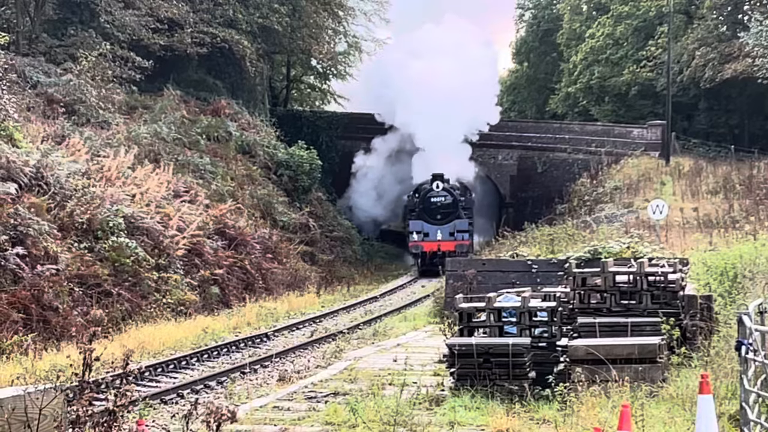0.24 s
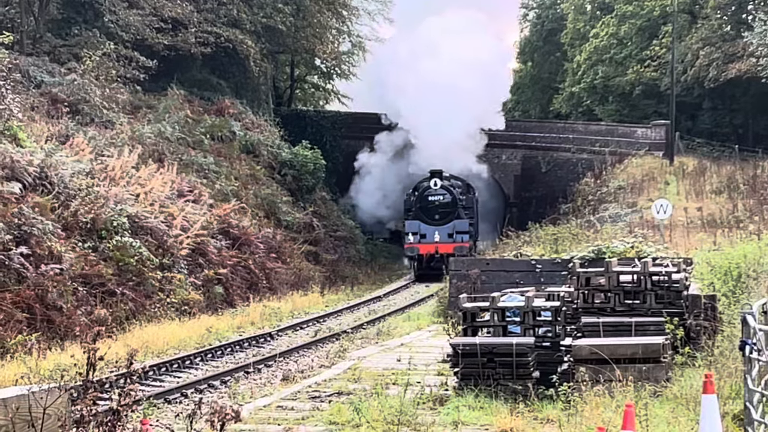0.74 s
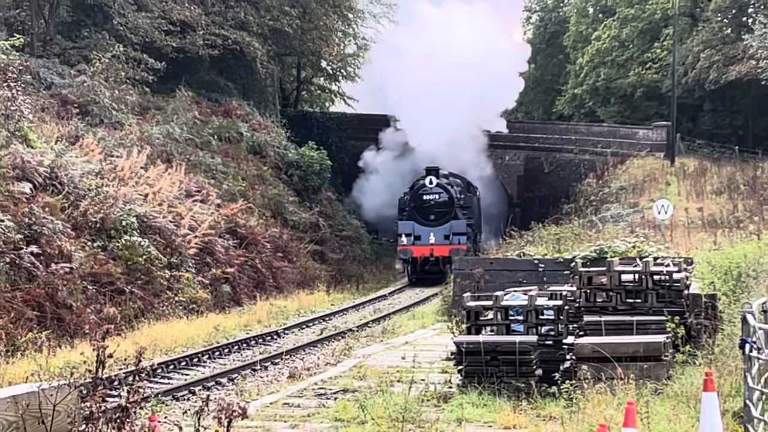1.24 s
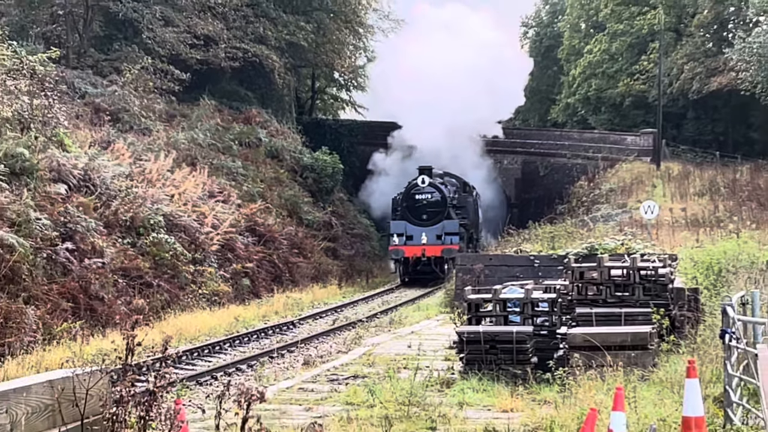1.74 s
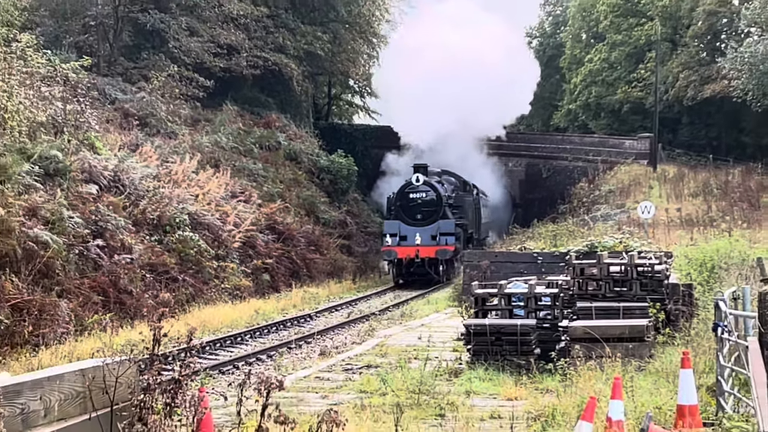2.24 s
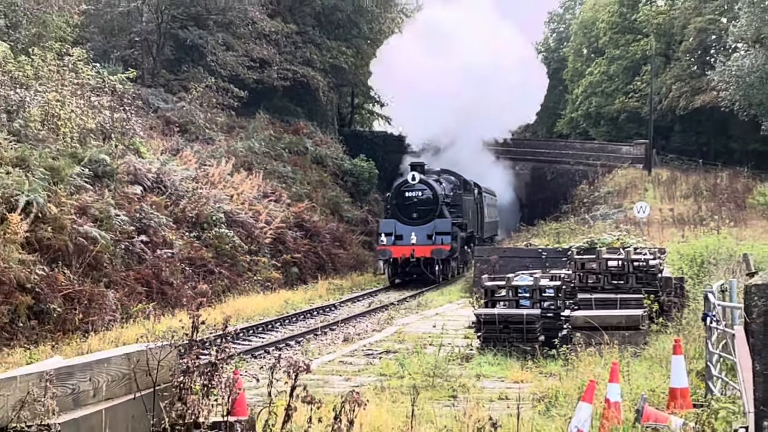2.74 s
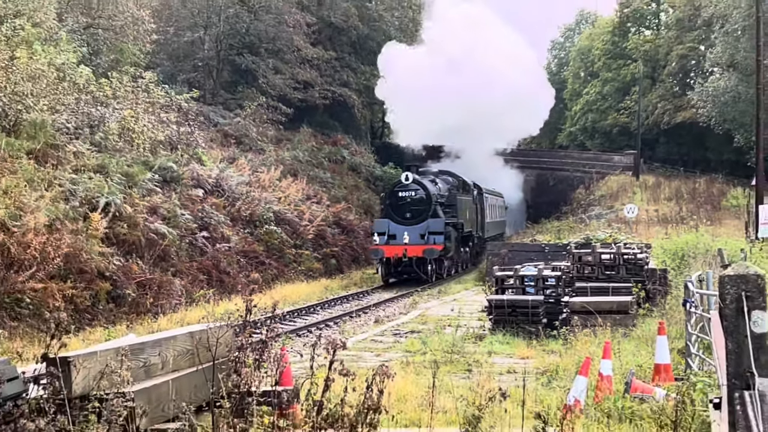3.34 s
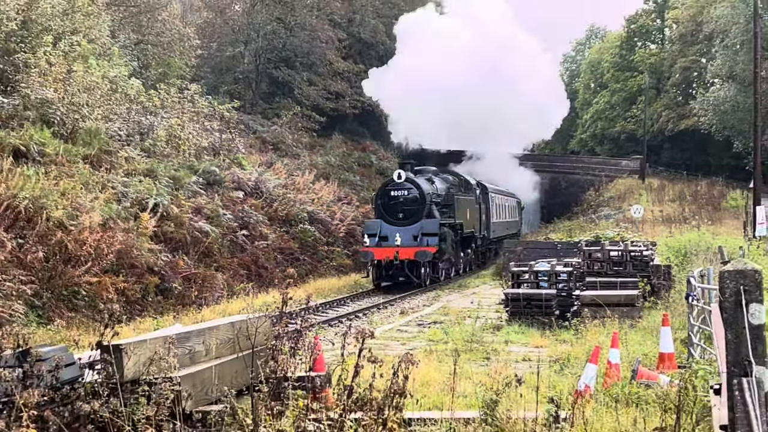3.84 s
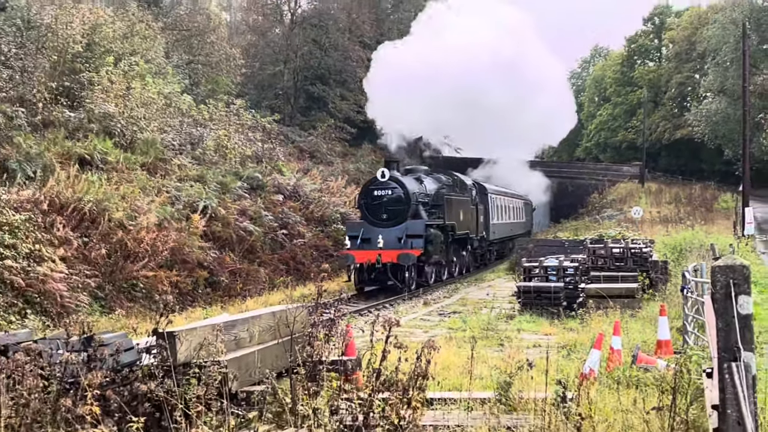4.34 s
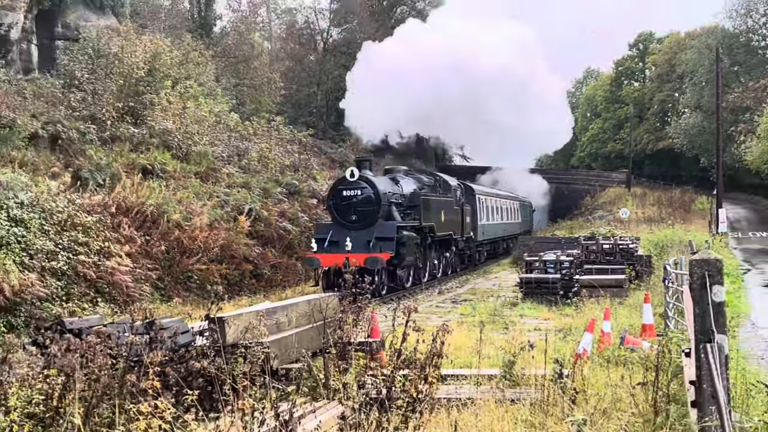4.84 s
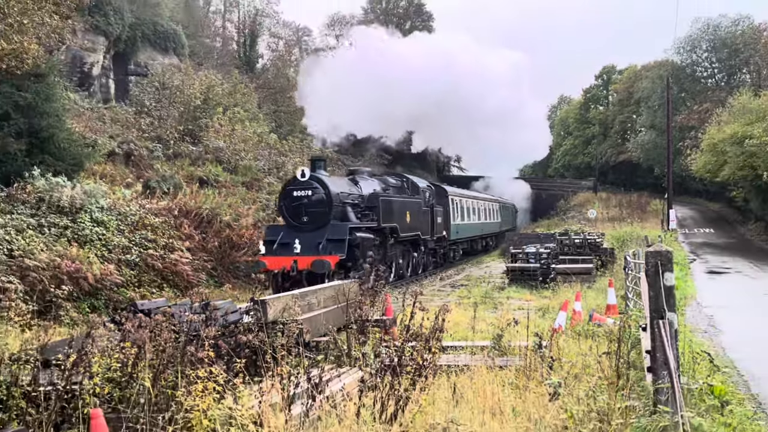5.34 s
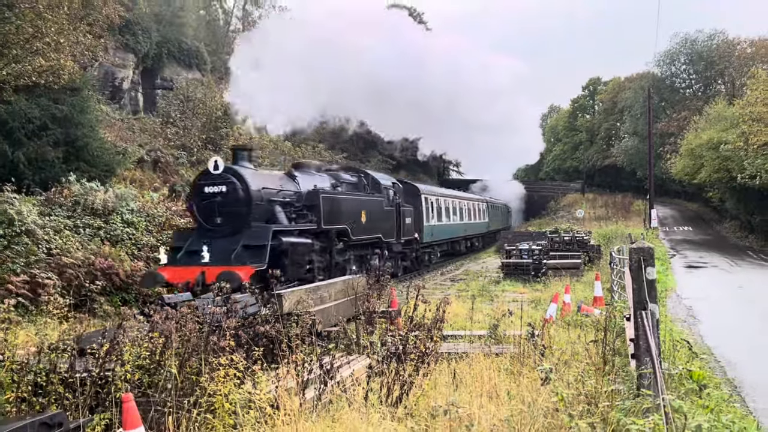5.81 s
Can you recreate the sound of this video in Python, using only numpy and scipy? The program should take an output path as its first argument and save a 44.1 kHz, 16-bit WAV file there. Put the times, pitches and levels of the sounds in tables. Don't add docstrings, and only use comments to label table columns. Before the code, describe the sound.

Outdoors in a wooded railway cutting, the end of a high steam whistle drops away at once and lingers as a thin, wavering echo for about a second. Under it, a steam engine puffs briskly, around nine uneven beats a second. It approaches throughout, the chuffs growing fuller, boomier and much louder, with hiss and wheel rumble filling the gaps. Stereo microphone near the track.

```python
import sys
import numpy as np
from scipy import signal
from scipy.fft import rfft, irfft, next_fast_len
from scipy.io import wavfile
from scipy.ndimage import uniform_filter1d, map_coordinates

SR = 44100
rng = np.random.default_rng(int(sys.argv[2]) if len(sys.argv) > 2 else 0)


def output_pcm(signal):
    pcm = np.clip(np.atleast_2d(signal).T, -1, 1) * 32767
    wavfile.write(sys.argv[1], SR, np.round(pcm).astype(np.int16))


def attenuation_scalar(level_db):
    decades = np.asarray(level_db, float) / 20
    return 10 ** decades


N = 267687

ZONE_HZ = [70, 200, 480, 1800, 7000]
# (pitch [Hz], puff [dB], background [dB])
COLOUR = [(25, -28, -16), (38.6, -13.5, -9.5), (74.5, -3, -4), (123, -11.5, -6.5), (202, -6, -6),
          (292, -8, -9), (485, -0.5, -9), (667, -7, -8.5), (1512, -5.5, -6), (2530, -3.5, -1.5),
          (4280, -9, -1.5), (6470, -1.5, 3.5), (10360, -6.5, -6), (13500, -8, -12)]
# (pitch [Hz], lag [s], rise [s], fall [s], echo tail [dB], gustiness [dB])
PUFF_SHAPE = [
    (50, 0.0083, 0.016, 0.03, -16, -5.5),
    (270, -0.00075, 0.02, 0.026, -9.5, 0.5),
    (1490, -0.0028, 0.014, 0.019, -5.5, 2.5),
    (8800, -0.0038, 0.026, 0.034, 1.5, 3.5),
]
# (pitch [Hz], width [Hz], level [dB])
CHIMNEY = [(66.5, 14, -5.5), (228.3, 20.3, -1.5), (424, 78, -12), (1400, 210, -9)]
# (time [s], level [dB])
WHISTLE_ECHO = [(0, -13.5), (.04, -25.5), (.13, -27.5), (.2, -21), (0.248, -22.5), (.29, -36.5), (.7, -43),
                (1.15, -45), (1.3, -54)]
# (pitch [Hz], width [Hz], level in the multiples [dB], extra fall [dB/s])
WHISTLE_NOTES = [
    (873, 16.4, 1.5, -5),
    (840.7, 47, 2, 7),
    (791, 38, -15, -2),
]
# (starting level [dB], share of the echo fade, extra fall [dB/s])
WHISTLE_PARTS = [
    (-6.5, 1.053, -0.7),
    (-19.5, 0.37, 14),
    (-27, .15, 18.5),
    (-26, 0.13, 30),
]
# (multiple, level over the third [dB], extra fall [dB/s])
TOP_TONES = [(4, 0, 13), (5, -6, 16), (6, -5.5, 10), (7, -7, 26), (8, -9.5, 30), (9, -14, 28),
             (10, -31, 35)]
# (pitch [Hz], left leads by [rad])
PORT_PHASE = [(4900, 0), (7850, -2.5), (8100, -3.08), (8780, -3.2), (9000, -3.8), (11200, -6.1),
              (12900, -6.5), (14700, -9.42)]
# (pitch [Hz], left leads by [rad])
LOW_PHASE = [(0, 0), (170, -.2), (520, -.3), (860, .45), (1550, -.15), (2800, .25), (3600, .05), (4900, 0)]
# (pitch [Hz], left over right [dB])
PORT_BALANCE = [(60, 0), (110, .1), (200, .9), (370, .4), (670, -2.6), (1240, -2.0), (2260, -1.2),
                (4140, 0), (13900, 0)]
# (pitch [Hz], level [dB])
SCATTER = [(40, -30), (90, -26), (200, -20), (370, -21), (670, -12), (1300, -7), (2300, -11), (3100, -16),
           (4300, -26), (6000, -11), (8400, -22), (10000, -15), (12000, -24), (15000, -24)]
# (time [s], first cancelled pitch [Hz], echo level [dB])
GROUND = [(0, 1900, -21), (1.8, 1820, -28), (3.5, 1065, -35), (5.2, 710, -17), (6.07, 637, -14)]
# (pitch [Hz], width [Hz], strongest [s], reach [s], level [dB])
RINGS = [(154, 31, 3.1, 1, 2.5), (1876, 36, 2.7, 0.9, 3), (1550, 53, 3.53, 0.43, 1),
         (1850, 38, 5.6, 1, 5.5)]
# (first puff [s], strength of puffs 1 to 4 [dB] x 4)
TURNS = [(0.048, 1.5, 1.5, -5, -0.5), (0.493, 0, 1.5, -1.5, -4), (0.941, 0.5, 2.5, -1.2, -1.8),
         (1.387, -2, 1.3, 0, -2.5), (1.829, -2.5, 3.5, -1, -1.5), (2.272, -2.5, 3, -0.5, 0.4),
         (2.716, -0.5, 3, 0.8, -1.5), (3.161, 0.5, 2.5, -1.5, -0.3), (3.6, 1, 3, -0.7, -2),
         (4.041, 0, 3, 1.6, -1.5), (4.479, -1.5, 2, -1.2, -2), (4.921, -1, 2.2, 2.1, 2),
         (5.358, 0.3, 3.5, 1.2, -1.5), (5.798, -3.5, 1.7, -1.2, 0.0)]
PUFF_S = [0, .109, .21, .328]
BOOMS = [(-4, 2, -4, 3.5), (2, 2, 3, 0), (-3, 3, 2.1, 4), (-1, 2.5, -1.8, -4), (-2, 3, 6, -1),
         (3.8, 1, -1.2, 0.5), (4, 2.5, 3, -2), (-6, 2, -4, 5.5), (-7, 1.7, 0.5, -5.5), (-3, 1, -2.5, -1),
         (-4, 1.5, -4.5, -1), (-0.8, -5, -3.5, 3.5), (3.3, 4.3, 1.8, 4.5), (1.5, 1, 2, 2)]
# (time [s], gain [dB])
NEARING = [(0, 0.5), (1.0, 4.5), (2.0, 8), (3.0, 10.5), (4.0, 13), (4.8, 17), (5.4, 17), (6.07, 22.5)]
# (level when far [dB], share of nearing, share of strength, share of boom, chance spread [dB])
PUFF_ZONES = [
    (-31.5, 0.84, 0.59, 0.19, 3),
    (-29.5, 1.086, 0.084, 1.1, 0.07),
    (-34, 1.002, 0.57, .1, 0.27),
    (-36, 0.64, 1.28, -0.09, 0.47),
    (-43.5, 0.67, 0.77, -0.037, .6),
]
# (level when far [dB], share of nearing)
BETWEEN_ZONES = [
    (-33.5, 0.72),
    (-36, 0.91),
    (-36, 0.91),
    (-46.5, 0.54),
    (-48.5, 0.59),
]


def rms_one(x):
    return x / np.sqrt(np.mean(x ** 2) + 1e-20)


def at_hz(rows, hz, column=1):
    rows = np.array(rows, float)
    return np.interp(np.log(hz), np.log(np.maximum(rows[:, 0], 1)), rows[:, column])


def resonate(x, hz, width):
    r = np.exp(-np.pi * width / SR)
    feedback = [1, -2 * r * np.cos(2 * np.pi * hz / SR), r * r]
    return signal.lfilter([(1 - r * r) / 2, 0, (r * r - 1) / 2], feedback, x)


def filtered(x, order, hz, kind):
    return signal.sosfilt(signal.butter(order, hz, kind, fs=SR, output="sos"), x)


def flutter(t, rate):
    knots = rng.standard_normal(1200)
    return map_coordinates(knots, [t * rate], order=3)


def ports(front, around):
    size = next_fast_len(N + SR)
    hz = np.maximum(np.arange(size // 2 + 1) * SR / size, 1)
    phase = np.interp(hz, *np.transpose(LOW_PHASE + PORT_PHASE[1:]))
    lead = attenuation_scalar(at_hz(PORT_BALANCE, hz) / 2) * np.exp(.5j * phase)
    tail_t, scatter_s = np.arange(SR // 4) / SR, 0.05
    tail = rng.standard_normal(SR // 4) * np.exp(-tail_t / scatter_s)
    direct = rfft(front, size)
    scattered = direct * attenuation_scalar(at_hz(SCATTER, hz)) * rfft(tail / np.linalg.norm(tail), size)
    unlike = scattered + rfft(around, size)
    left, right = lead * (direct + unlike), (direct - unlike) / lead
    return irfft(np.array([left, right]), size)[:, :N]


def cutting(x):
    n = np.arange(N)
    t = n / SR
    s, notch_hz, echo_db = np.transpose(GROUND)
    dull = filtered(x, 1, 5000, "low")
    lag = SR / 2 / np.interp(t, s, notch_hz)
    echo = np.interp(n - lag, n, dull) * attenuation_scalar(np.interp(t, s, echo_db))
    rings = 0
    for hz, width, strongest, reach, db in RINGS:
        rings = rings + resonate(x, hz, width) * attenuation_scalar(db) * np.exp(-((t - strongest) / reach) ** 2)
    return 0.78 * (x + echo + rings)


def whistle_band(t, multiple, notes):
    held_loss_db = 1
    evenness = 0.35
    break_up_db, break_up_s = 2.5, 0.4
    noise = rng.standard_normal((len(notes), len(t) + 9000))
    band = 0
    for n, (hz, width, db, fall) in zip(noise, notes):
        once = resonate(n, multiple * hz, multiple * width)
        tone = resonate(once, multiple * hz, multiple * width)[9000:]
        is_held = hz == WHISTLE_NOTES[0][0]
        level_db = db - fall * t - held_loss_db * (multiple - 4) * is_held
        band = band + attenuation_scalar(level_db) * rms_one(tone)
    band = rms_one(band)
    patches = attenuation_scalar(break_up_db * np.minimum(t / break_up_s, 1) ** 2 * flutter(t, 21.86))
    return patches * band / np.sqrt(uniform_filter1d(band ** 2, size=2500) + evenness)


def whistle():
    t = np.arange(round(1.8 * SR)) / SR
    s, echo_db = np.transpose(WHISTLE_ECHO)
    fading = np.interp(t, s, echo_db - echo_db[0]) - 80 * np.maximum(t - s[-1], 0)
    held, sagging, second, third = [db + share * fading - fall * t for db, share, fall in WHISTLE_PARTS]
    out = whistle_band(t, 1, WHISTLE_NOTES[:1]) * attenuation_scalar(held)
    out = out + whistle_band(t, 1, WHISTLE_NOTES[1:]) * attenuation_scalar(sagging)
    out = out + whistle_band(t, 2, WHISTLE_NOTES) * attenuation_scalar(second)
    out = out + whistle_band(t, 3, WHISTLE_NOTES) * attenuation_scalar(third)
    for multiple, db, fall in TOP_TONES:
        out = out + whistle_band(t, multiple, WHISTLE_NOTES) * attenuation_scalar(third + db - fall * t)
    jet_db, jet_t60_s = -35, 0.54
    jet = filtered(rng.standard_normal(len(t)), 2, 4500, "high")
    return np.pad(out + jet * attenuation_scalar(jet_db - 60 * t / jet_t60_s), (0, N - len(t)))


def engine():
    tail_s = 0.18
    air_db = -8.5
    puff_colour_db = 1.3
    t = np.arange(0, N + 32, 32) / SR
    turns = np.array(TURNS)
    puff_t = (turns[:, :1] + PUFF_S).ravel()
    strength = turns[:, 1:].ravel()
    near = np.interp(puff_t, *np.transpose(NEARING))
    puff_db = np.array([db + a * near + b * strength + c * np.ravel(BOOMS)
                        + chance * rng.standard_normal(len(puff_t))
                        for db, a, b, c, chance in PUFF_ZONES])
    between_db = np.array([db + a * np.interp(t, *np.transpose(NEARING)) for db, a in BETWEEN_ZONES])
    white = rng.standard_normal((2, N + 9000))
    gusts = 0.45 * flutter(t, 45) + 0.25 * flutter(t, 130)
    out = np.zeros(N)
    edges = 22 * 2 ** (np.arange(30) / 3)
    for k, (low, high) in enumerate(zip(edges, edges[1:])):
        hz = np.sqrt(low * high)
        place = np.interp(np.log(hz), np.log(ZONE_HZ), np.arange(5))
        mix = np.maximum(1 - np.abs(place - np.arange(5)), 0)
        lag, rise, fall, tail_db, gust_db = [at_hz(PUFF_SHAPE, hz, column=c) for c in (1, 2, 3, 4, 5)]
        uneven = rng.standard_normal((len(puff_t), 2))
        since = t - (puff_t + lag + 0.0052 * uneven[:, 0])[:, None]
        opening, closing = np.abs(since / rise) ** 4.3, np.abs(since / fall) ** 2
        puff = np.exp(-np.where(since < 0, opening, closing))
        level_db = mix @ puff_db + at_hz(COLOUR, hz) + puff_colour_db * uneven[:, 1]
        power = attenuation_scalar(level_db) ** 2 @ puff
        keep = np.exp(-t[1] / tail_s)
        power = power + attenuation_scalar(tail_db) ** 2 * signal.lfilter([1 - keep], [1, -keep], power)
        power = power * attenuation_scalar(gust_db * gusts) ** 2
        steady_db = mix @ between_db + at_hz(COLOUR, hz, column=2) + 0.7 * flutter(t, 9)
        power = power + attenuation_scalar(steady_db) ** 2
        power = power * attenuation_scalar(air_db * (hz / 9460.0) ** 2 * (1 - t * SR / N)) ** 2
        band = filtered(white[k % 2], 2, [low, high], "band")[9000:]
        out += np.interp(np.arange(N) / SR, t, np.sqrt(power)) * rms_one(band)
    return 0.72 * out + sum(attenuation_scalar(db) * resonate(out, hz, width) for hz, width, db in CHIMNEY)


def scene():
    echo_side_db = -11
    return ports(cutting(engine()) + whistle(), attenuation_scalar(echo_side_db) * whistle())


def low_pass(x):
    return signal.sosfilt(signal.butter(12, 15750, fs=SR, output="sos"), x)


def record(dry):
    heard = filtered(dry, 3, 29, "high")
    rounded = np.tanh(heard * .95) / .95
    return low_pass(rounded)


dry = scene()
out = record(dry)
output_pcm(out)
```